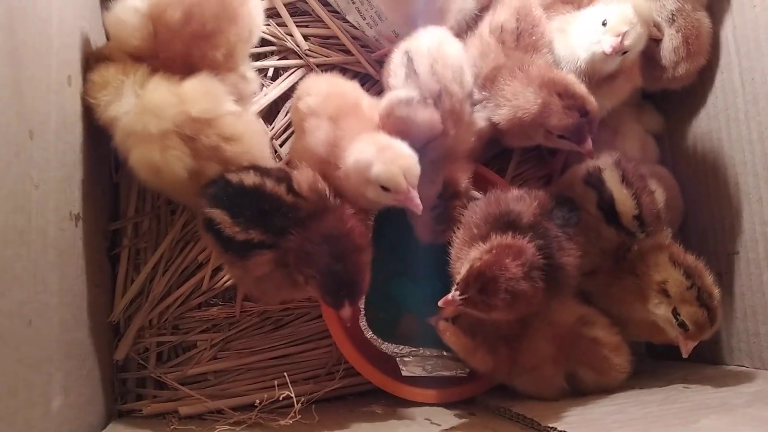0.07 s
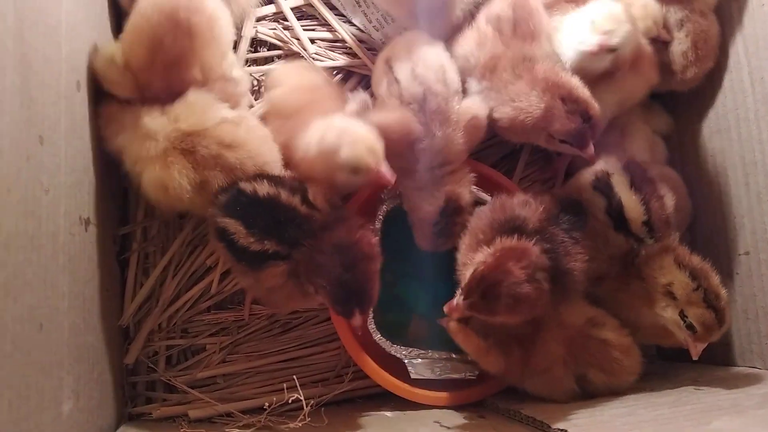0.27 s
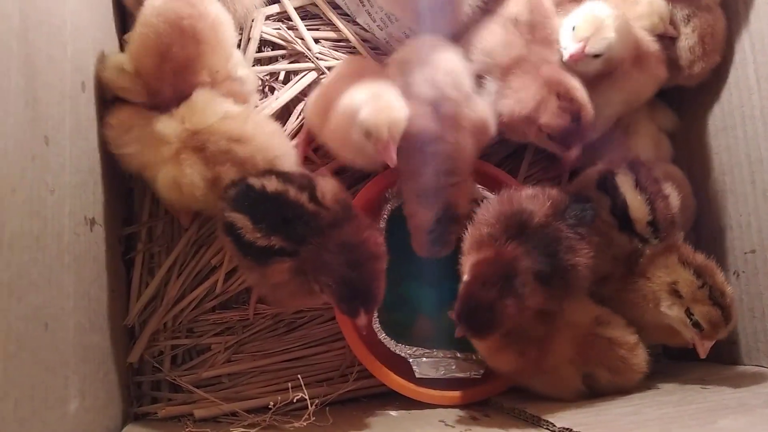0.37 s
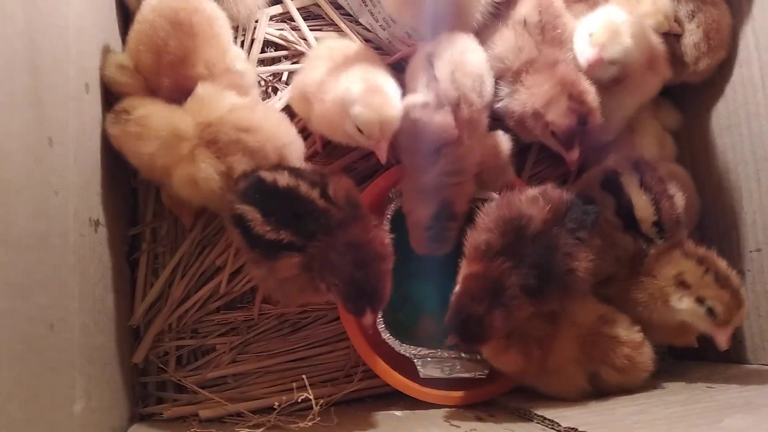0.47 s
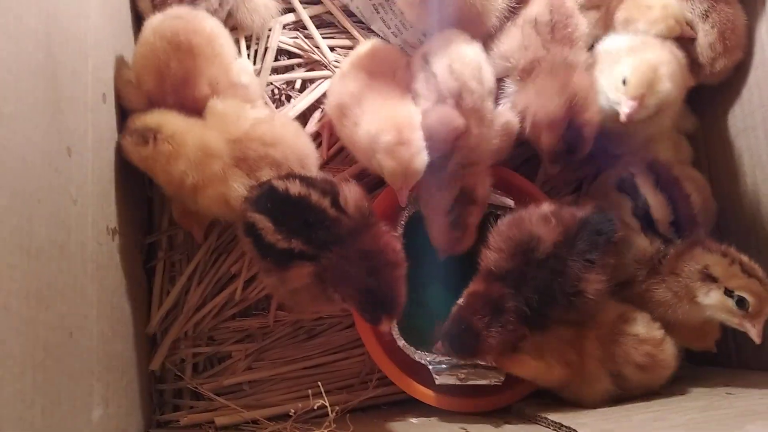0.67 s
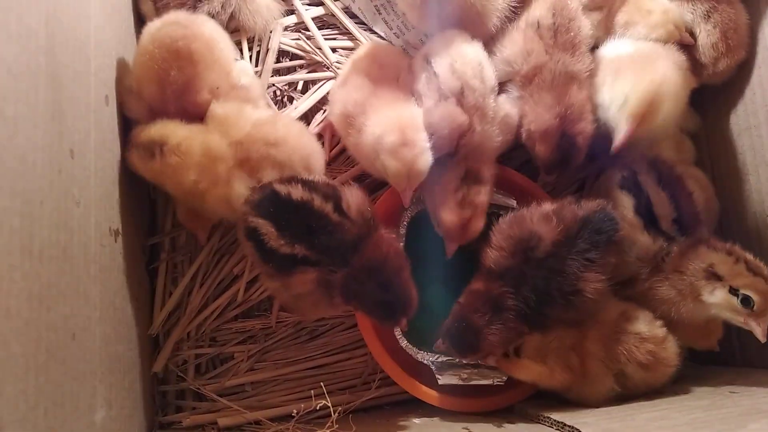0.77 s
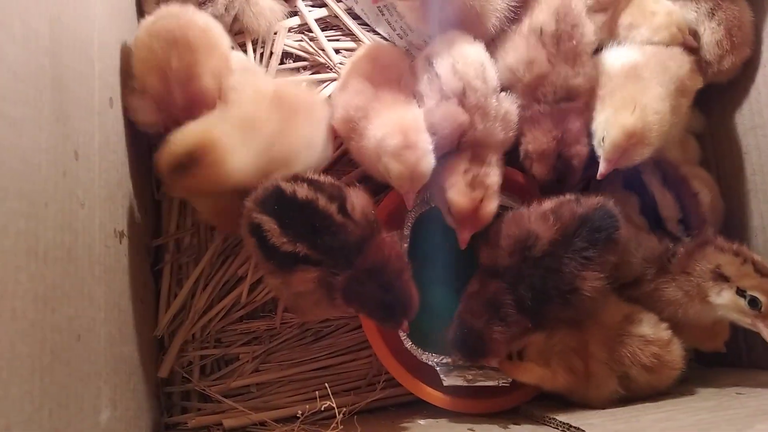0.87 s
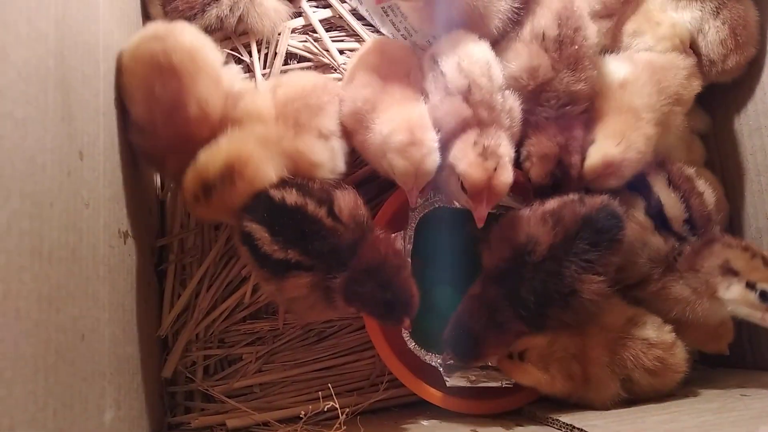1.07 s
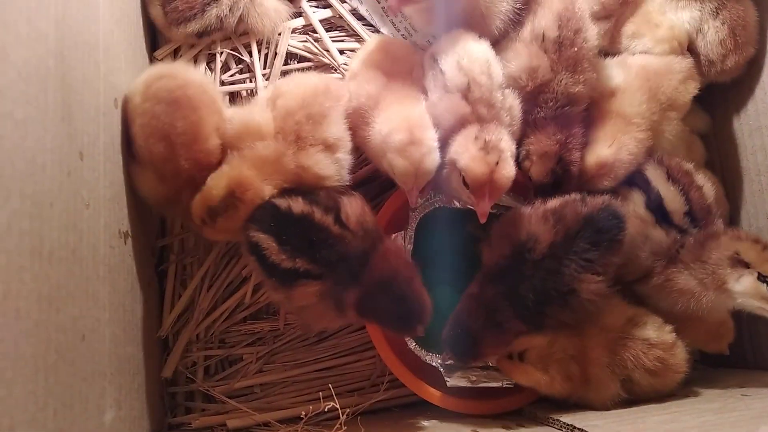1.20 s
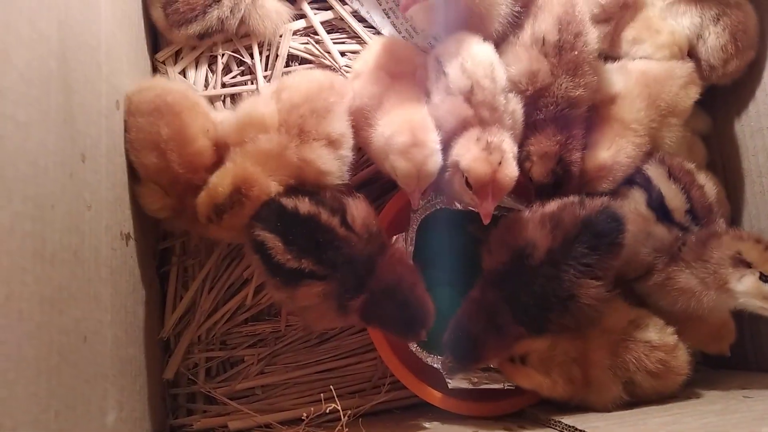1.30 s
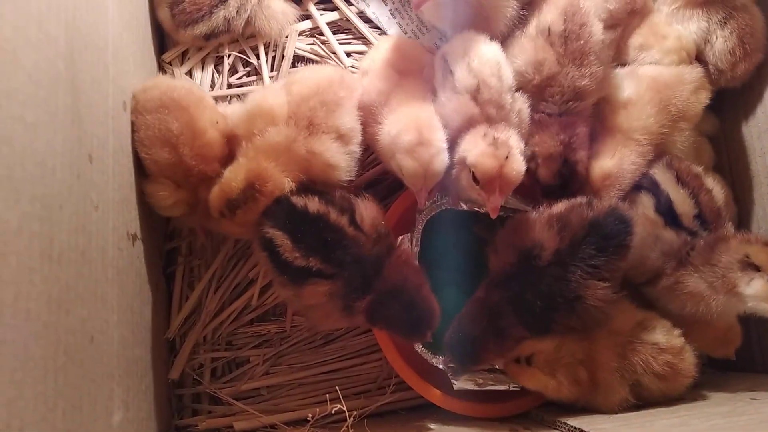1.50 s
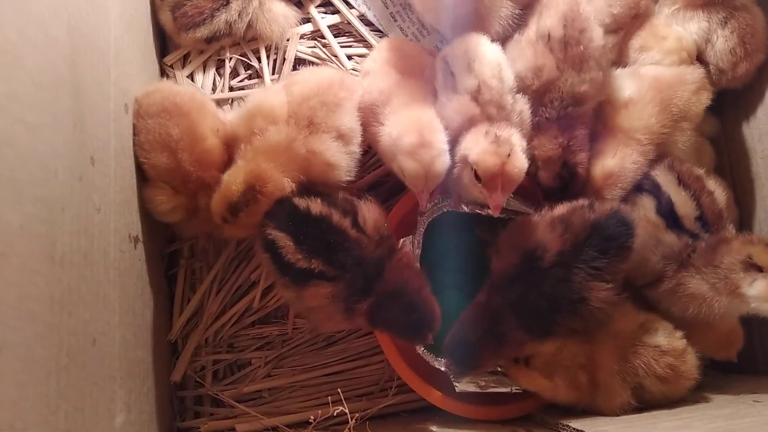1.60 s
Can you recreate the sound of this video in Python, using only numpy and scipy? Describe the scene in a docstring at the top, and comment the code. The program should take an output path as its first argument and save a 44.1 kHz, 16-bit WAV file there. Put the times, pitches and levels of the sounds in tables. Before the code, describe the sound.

Chicks tap and peck in a straw-lined box, giving a few short, high peeps.

```python
"""Chicks round a plastic feeding dish in a straw-lined cardboard box, heard from just above.
Straw rustles first; at 0.25 s a rising, whistled peep leads a burst of pecks, hollow taps and feet
thumping the box floor. Soft falling peeps and shuffles follow. At 0.9 s a claw sticks and slips across
the floor: a falling, rasping squeak. Then more taps, steps and quieter peeps; from 1.35 s the dish hums
and down brushes the wall. Faint patter and room noise run throughout."""
import sys
import numpy as np
from scipy import signal
from scipy.fft import rfft, irfft
from scipy.io import wavfile

SR = 44100
rng = np.random.default_rng(int(sys.argv[2]) if len(sys.argv) > 2 else 0)


def transcribe(u):
    """Save the signal u as a 16-bit wav file named by the first command-line argument.

    u: samples, shape (n,) or (channels, n), limited to [-1, 1]; the rate is SR.
    q: integer samples, one column per channel.
    """
    v = np.clip(np.atleast_2d(u).T, -1, 1)
    q = np.round(v * 32767).astype(np.int16)
    wavfile.write(sys.argv[1], SR, q)


N = 72765
T = np.arange(N) / SR

# rising peeps: t/s, length/s, start f/Hz, top f/Hz, level/dB, fade/dB, pan/dB
ARCHED_PEEPS = [(0.25, 0.039, 2450, 3827, -25.5, 16.5, -7.5), (1.178, 0.049, 2350, 4240, -39.5, 3.5, -7.5)]
# soft peeps: t/s, length/s, start f/Hz, end f/Hz, level/dB, pan/dB
FALLING_PEEPS = [(.123, .027, 3180, 2920, -46.5, -6), (.621, .031, 3300, 2930, -54, -9),
                 (.684, .032, 4030, 2970, -46, 0), (1.166, .017, 2360, 2330, -55, -12),
                 (1.319, .035, 3280, 2870, -54, -13)]
# beak and claw strikes: t/s, level/dB, brightness/dB, pan/dB
PECKS = [(0.115, -41.5, -0.5, 9), (.292, -31, -3.5, -12), (0.2993, -24.5, -2, -4.5), (0.3226, -55, 12, 21),
         (0.6133, -45.5, 0, 3), (0.6597, -45.5, -2.5, -11), (0.68, -43.5, -5.5, 2), (1.09, -46.5, 1, 1),
         (1.211, -44.5, 3, -5), (1.369, -53.5, 7, 10.5), (1.5584, -52.5, 7, -13)]
# hollow taps on dish and box: t/s, level/dB, f/Hz
TAPS = [(0.259, -21.5, 527), (0.295, -10.5, 482), (0.975, -19, 940), (1.09, -24.5, 1676),
        (1.098, -37, 2070), (1.286, -30.5, 1330), (1.508, -42.5, 2220)]
# footfalls: t/s, level/dB, f/Hz, T60/s
STEPS = [(0.2661, -20.5, 149.5, 0.045), (0.3002, -19.5, 183.8, 0.074), (0.361, -46, 150, 0.051),
         (.463, -50, 178, 0.074), (0.66, -36, 188.7, 0.075), (0.683, -40.5, 136.6, 0.093),
         (0.905, -37, 397, 0.021), (0.978, -37.5, 147, 0.073), (1.134, -46.5, 278, 0.038),
         (1.211, -47.5, 183, 0.039), (1.302, -41, 212, 0.049), (1.368, -31.5, 143, 0.035)]
# dish hum: f/Hz, level/dB, T60/s
DISH_MODES = [(266, -45.5, 0.14), (400, -56, 0.42)]
# claw squeak: t/s, slip rate/Hz, level/dB
CLAW_PATH = [(0.905, 1002, -48.5), (.916, 1045, -51.5), (0.921, 703, -48.5), (0.934, 725.6, -49),
             (0.944, 473.3, -43.5), (0.965, 472.8, -37.5), (0.974, 420.7, -61)]
# strokes through straw: t/s, length/s, level/dB, brightness/dB, pan/dB
SHUFFLES = [(0.061, 0.057, -64.5, 5, 11.5), (0.106, 0.012, -48, 2.5, -1), (0.148, 0.011, -60, 0.5, -6.5),
            (0.227, 0.042, -46.5, -0.5, 0), (0.287, 0.04, -48, 0.5, 0.5), (0.521, 0.14, -70, -1, -0.5),
            (0.661, 0.046, -65.5, 0.5, -10), (0.792, 0.022, -86, 15.5, 12.5), (1.199, 0.03, -62.5, 4.5, 0),
            (1.356, 0.012, -55.5, 2.5, 2.5)]
# single stalks snapping: t/s, level/dB
STALK_SNAPS = [(0.067, -48), (0.085, -45), (0.537, -51), (0.593, -51), (1.538, -38), (1.631, -55)]
# down on the wall: t/s, level/dB
BRUSH_LEVELS = [(1.33, -75.5), (1.54, -69.5), (1.65, -84.5)]
# box and dish resonances: f/Hz, width/Hz, boost/dB
BOX_MODES = [(473, 18, 4.5), (712, 24, 4), (1760, 250, 2.5), (2150, 330, 7)]
# room noise spectrum: f/Hz, relative level/dB
ROOM_SPECTRUM = [(29, -76), (50, -20.5), (413, -15), (829, -17), (2330, -19), (6380, -19.5), (7730, -25.5),
                 (15500, -48.5)]

HOLLOW_HZ, CRACK_HZ, CRISP_HZ, AIR_HZ = 360, 2510, 4280, 7360  # lower band edges
PECK_DECAY_S, STROKE_ATTACK_S = 0.0027, 0.0052


def chicks(top_share=0.69):
    """Louder peeps arch up and over; soft ones only sink."""
    out = 0
    for s, length_s, start_hz, top_hz, db, fade_db, pan_db in ARCHED_PEEPS:
        progress = np.clip((T - s) / length_s, 0, 1)
        arch = np.sin(np.pi / 2 * np.interp(progress, [0, top_share, 1], [0, 1, 1.514]))
        hz = start_hz + (top_hz - start_hz) * arch ** 1.4
        out += peep(progress, hz, db - fade_db * progress, pan_db, octave_gain=from_db(-15))
    for s, length_s, start_hz, end_hz, db, pan_db in FALLING_PEEPS:
        progress = np.clip((T - s) / length_s, 0, 1)
        hz = end_hz + (start_hz - end_hz) * (1 - progress) ** 1.4
        out += peep(progress, hz, db, pan_db)
    return box_echo(out, echo_db=-12)


def peep(progress, hz, db, pan_db, octave_gain=0, octave_limit_hz=6550, edge_share=0.091):
    """Near-pure whistle; a pressed one shows its octave while the pitch is low."""
    edge = np.clip(np.minimum(progress, 1 - progress) / edge_share, 0, 1)
    phase = jittered_phase(hz, depth=0.003, bandwidth_hz=650)
    octave = octave_gain / (1 + (2 * hz / octave_limit_hz) ** 20) * np.sin(2 * phase)
    return from_db(db) * np.sin(np.pi / 2 * edge) * (panned(np.sin(phase), pan_db) + octave)


def pecks():
    """Crunches that die within milliseconds; harder strikes reach lower."""
    median_db = np.median(np.array(PECKS)[:, 1])
    out = 0
    for s, db, bright_db, pan_db in PECKS:
        low_hz = min(1200 * from_db(0.68 * (median_db - db)), CRACK_HZ)
        grain = 2 * rng.standard_normal(N)
        crunch = friction(grain, strike(s, PECK_DECAY_S), -bright_db, bright_db, low_hz)
        out += panned(from_db(db) * crunch, pan_db)
    return out


def taps():
    """Blunt taps ring briefly, pitched by the spot hit."""
    out = 0
    for s, db, hz in TAPS:
        force = strike(s, decay_s=0.0071) * rng.standard_normal(N)
        out += from_db(db) * resonance(force, hz, width_hz=244)
    return panned(out, pan_db=-3)


def floor_and_dish(knock_s=1.355):
    """The box floor drums under steps and the patter of small feet; the knocked dish hums."""
    steps = sum(from_db(db) * (ring(s, hz, t60_s) + from_db(-10) * ring(s, 1.365 * hz, t60_s))
                for s, db, hz, t60_s in STEPS)
    hum = sum(from_db(db) * ring(knock_s, hz, t60_s) for hz, db, t60_s in DISH_MODES)
    patter = from_db(-72) * unit_rms(band(clicks(per_s=140), [125, 260], "band"))
    return panned(band(steps + hum + patter, 132, "high", order=3), pan_db=-2)


def claw_drag(pan_db=3.5):
    """Slowing stick-slip: a rough squeak, and a rasp pulsed at the slip rate."""
    times_s, rates_hz, levels_db = np.transpose(CLAW_PATH)
    slip_hz = np.interp(T, times_s, rates_hz)
    phase = jittered_phase(slip_hz, depth=0.025, bandwidth_hz=307)
    octave_gain = from_db(-9) * slip_hz / rates_hz.mean()
    envelope = from_db(np.interp(T, times_s, levels_db)) * (T > times_s[0]) * (T < times_s[-1])
    squeak = envelope * (np.sin(phase) + octave_gain * np.sin(2 * phase))
    slips = rng.standard_normal(N) * (1 + np.cos(phase)) ** 2
    pressure = stroke(times_s[0] - STROKE_ATTACK_S / 2, length_s=0.094)
    rasp = from_db(-51.5) * friction(slips, pressure, hollow_db=2.5, crisp_db=-4, low_hz=530)
    return panned(squeak, pan_db), panned(rasp, pan_db)


def shuffles(snaps_per_stroke=70):
    """Feet push through straw: snaps over a little hiss, sparser in slow strokes."""
    out = 0
    for s, length_s, db, bright_db, pan_db in SHUFFLES:
        crackle = unit_rms(clicks(snaps_per_stroke / length_s) + 0.57 * rng.standard_normal(N))
        rustle = friction(crackle, stroke(s, length_s), -bright_db, bright_db)
        out += panned(from_db(db) * rustle, pan_db)
    return out


def stalk_snaps():
    """Single stalks break, thin and bright."""
    envelope = sum(from_db(db) * strike(s, PECK_DECAY_S) for s, db in STALK_SNAPS)
    force = envelope * rng.standard_normal(N)
    return panned(band(force, [CRISP_HZ, AIR_HZ], "band", order=1), pan_db=6)


def down_brush():
    """Thin hiss of down along cardboard."""
    times_s, levels_db = np.transpose(BRUSH_LEVELS)
    hiss = unit_rms(resonance(rng.standard_normal((2, N)), hz=4640, width_hz=150))
    return (T > times_s[0]) * from_db(np.interp(T, times_s, levels_db)) * hiss


def box_echo(x, echo_db, t60_s=0.036, split_hz=870, gap_s=0.0006):
    """Direct sound plus quick wall reflections, alike at both ears in the bass only."""
    t = T[:SR // 8]
    noise = rng.standard_normal((3, len(t)))
    tail = band(noise[2], split_hz, "low") + band(noise[:2], split_hz, "high")
    tail *= from_db(-60 * t / t60_s) * (t > gap_s)
    tail = band(unit_rms(tail), CRISP_HZ, "low") / np.sqrt(len(t))
    echo = signal.fftconvolve(x, tail, axes=1)[:, :N]
    return (x + from_db(echo_db) * echo) / np.hypot(1, from_db(echo_db))


def room_noise():
    """Faint and steady, alike at both ears in the bass."""
    hz, db = np.transpose(ROOM_SPECTRUM)
    noise = rng.standard_normal((3, N))
    stereo = band(noise[2], 1900, "low") + band(noise[:2], 1000, "high")
    bins_hz = np.arange(N // 2 + 1) * SR / N
    colour = from_db(np.interp(np.log(bins_hz + 1), np.log(hz), db))
    return from_db(-71) * unit_rms(irfft(rfft(stereo) * colour, N))


def friction(grain, envelope, hollow_db, crisp_db, low_hz=HOLLOW_HZ):
    """Three registers: hollow cardboard, cracking stalks, crisp stalk tips."""
    force = grain * envelope
    hollow = unit_rms(band(band(force, low_hz, "high"), CRACK_HZ, "low", order=4))
    crack = unit_rms(band(force, [CRACK_HZ, CRISP_HZ], "band", order=3))
    crisp = unit_rms(band(force, [CRISP_HZ, AIR_HZ], "band", order=4))
    air = unit_rms(band(band(force, AIR_HZ, "high", order=4), 11200, "low", order=4))
    mix = from_db(hollow_db) * hollow + crack + from_db(crisp_db) * (crisp + from_db(-8.5) * air)
    return np.sqrt(np.mean(envelope ** 2)) * mix


def strike(s, decay_s, attack_s=0.00023):
    """Envelope of a blow."""
    t = np.maximum(T - s, 0)
    return (1 - np.exp(-t / attack_s)) * np.exp(-t / decay_s)


def stroke(s, length_s, release_s=0.009):
    """Envelope of a foot stroke: attack, hold, release."""
    attack = np.clip((T - s) / STROKE_ATTACK_S, 0, 1)
    return attack * np.exp(-np.maximum(T - s - length_s, 0) / release_s)


def ring(s, hz, t60_s, attack_s=0.0012):
    """Struck mode, soft onset."""
    t = np.maximum(T - s, 0)
    return np.sin(2 * np.pi * hz * t) * from_db(-60 * t / t60_s) * (1 - np.exp(-t / attack_s))


def clicks(per_s, spread_db=3):
    """Random impulses of uneven size."""
    sizes = from_db(spread_db * np.minimum(rng.exponential(1, N), 4)) * rng.choice([-1, 1], N)
    return unit_rms(sizes * (rng.random(N) < per_s / SR))


def jittered_phase(hz, depth, bandwidth_hz):
    """Phase/rad of a randomly wavering pitch."""
    waver = unit_rms(band(rng.standard_normal(N), bandwidth_hz, "low"))
    return 2 * np.pi * np.cumsum(hz * (1 + depth * waver)) / SR


def resonance(x, hz, width_hz):
    """Two-pole band-pass, peak gain 1."""
    radius = np.exp(-np.pi * width_hz / SR)
    feedback = [1, -2 * radius * np.cos(2 * np.pi * hz / SR), radius ** 2]
    return signal.lfilter(np.array([1, 0, -1]) * (1 - radius ** 2) / 2, feedback, x)


def band(x, hz, kind, order=2):
    """Butterworth filter."""
    return signal.sosfilt(signal.butter(order, hz, kind, fs=SR, output="sos"), x + 1e-18)


def panned(x, pan_db):
    """Mono to stereo; pan is left minus right."""
    return x * from_db(np.array([[0.5], [-0.5]]) * pan_db)


def unit_rms(x):
    return x / np.sqrt(np.mean(x ** 2) + 1e-20)


def from_db(db):
    return 10 ** (np.asarray(db) / 20)


def scene():
    """Contacts excite box and dish modes; squeak, peeps, thumps and background join them."""
    squeak, rasp = claw_drag()
    contacts = pecks() + taps() + stalk_snaps() + shuffles() + rasp
    ringing = sum((from_db(db) - 1) * resonance(contacts, hz, width_hz) for hz, width_hz, db in BOX_MODES)
    in_box = box_echo(contacts + ringing, echo_db=-1) + box_echo(squeak, echo_db=-12)
    return in_box + chicks() + floor_and_dish() + down_brush() + room_noise()


def record(dry, left_lag_s=0.00018, shelf_hz=4920, cutoff_hz=15700):
    """Left microphone slightly farther and brighter than the right; top cut."""
    hz = np.arange(N // 2 + 1) * SR / N
    shelf = 1 - 1 / (1 + (hz / shelf_hz) ** 12)
    treble_db = shelf * np.array([[4], [-8]])
    lag = np.exp(-2j * np.pi * hz * np.array([[left_lag_s], [0]]))
    mics = irfft(rfft(dry) * lag * from_db(treble_db), N)
    return signal.sosfilt(signal.ellip(10, 0.3, 80, cutoff_hz, fs=SR, output="sos"), mics)


dry = scene()
out = record(dry)
transcribe(out)
```